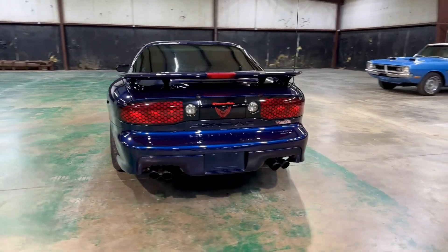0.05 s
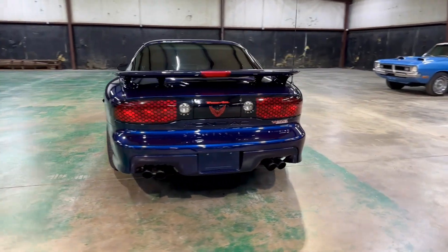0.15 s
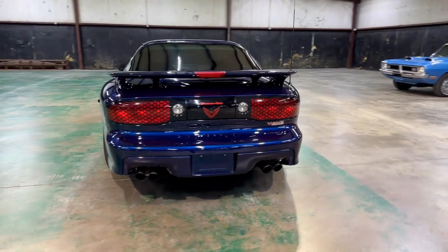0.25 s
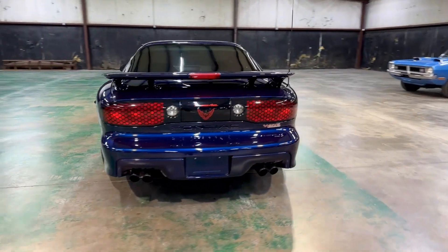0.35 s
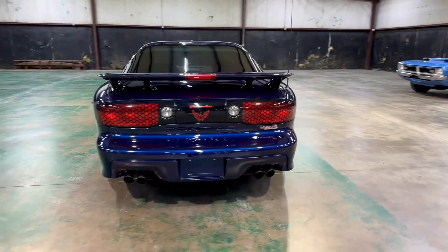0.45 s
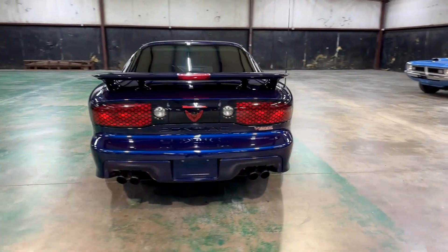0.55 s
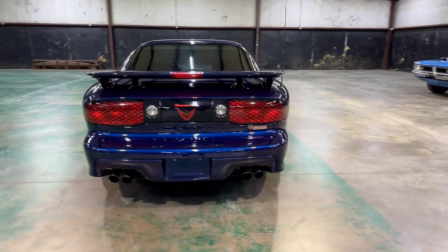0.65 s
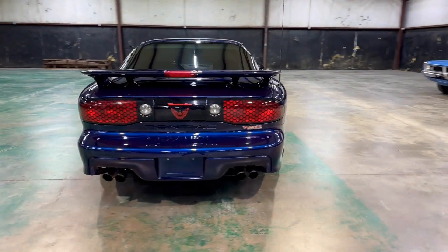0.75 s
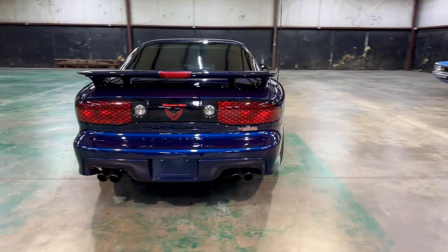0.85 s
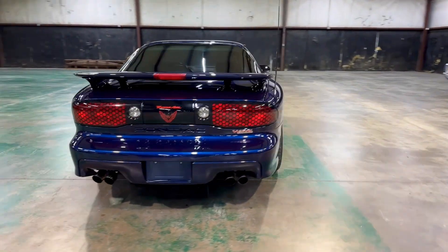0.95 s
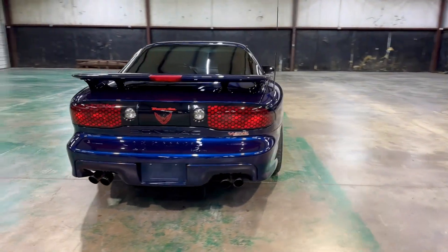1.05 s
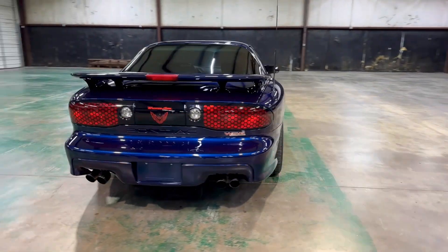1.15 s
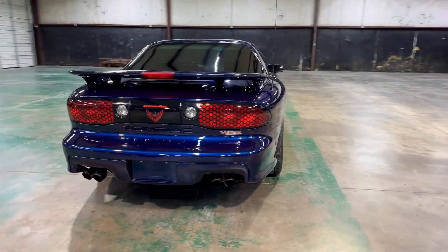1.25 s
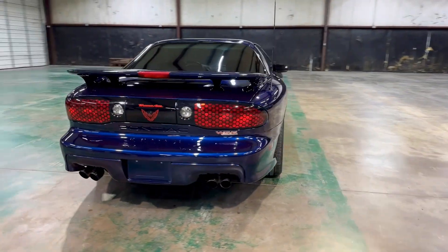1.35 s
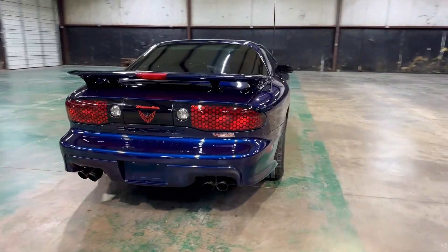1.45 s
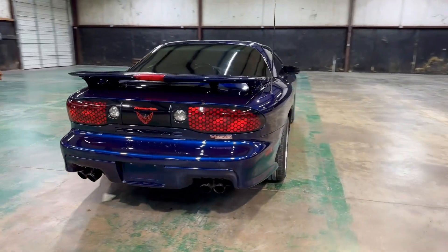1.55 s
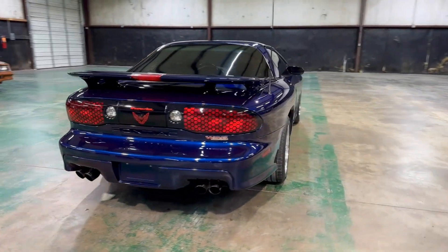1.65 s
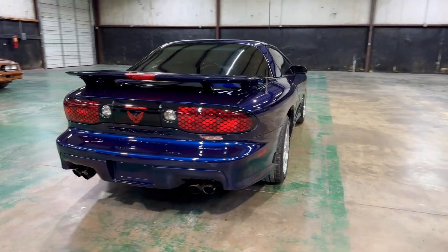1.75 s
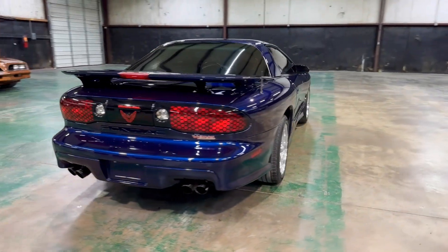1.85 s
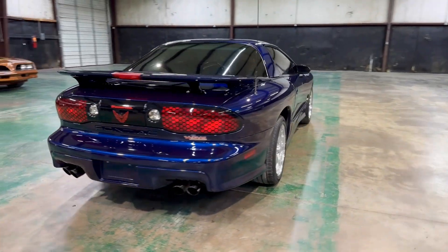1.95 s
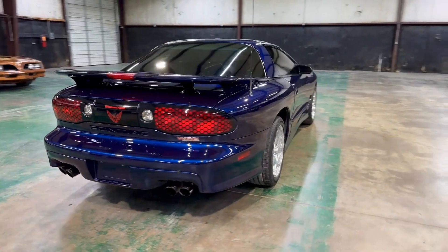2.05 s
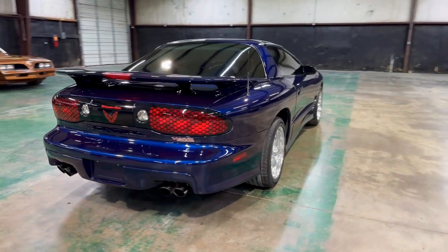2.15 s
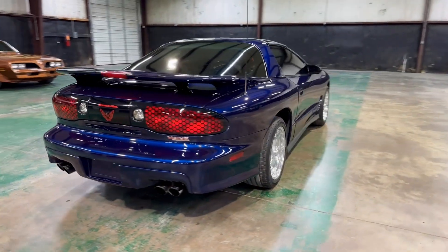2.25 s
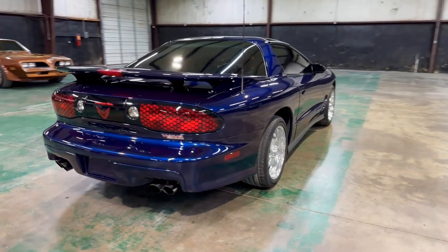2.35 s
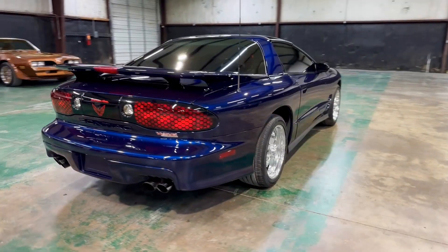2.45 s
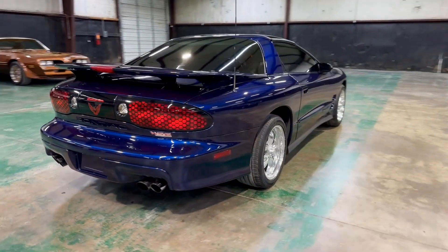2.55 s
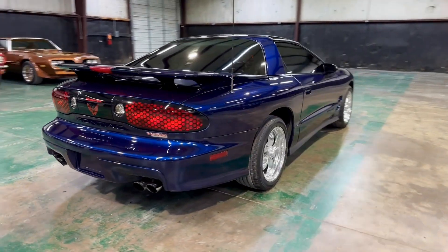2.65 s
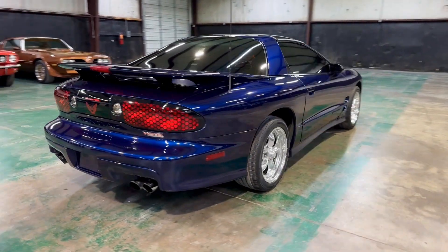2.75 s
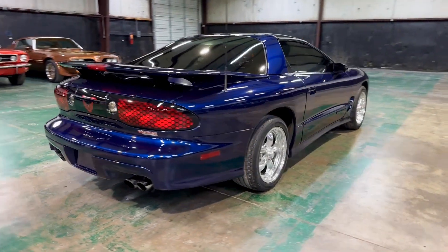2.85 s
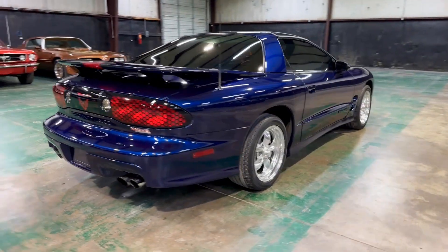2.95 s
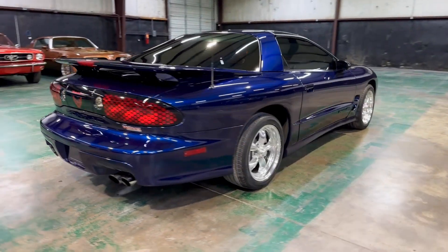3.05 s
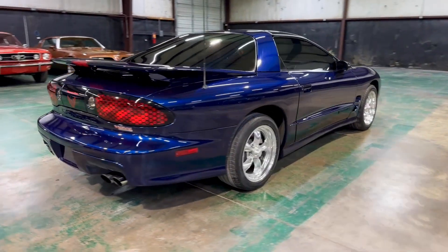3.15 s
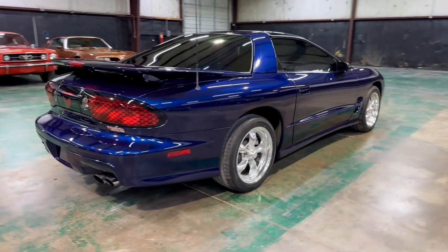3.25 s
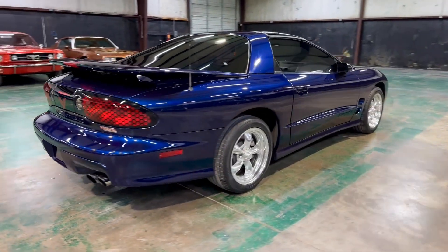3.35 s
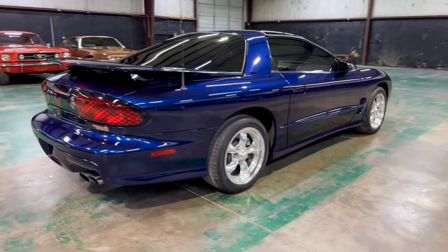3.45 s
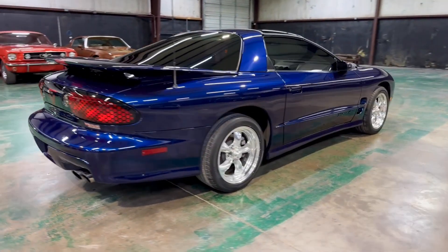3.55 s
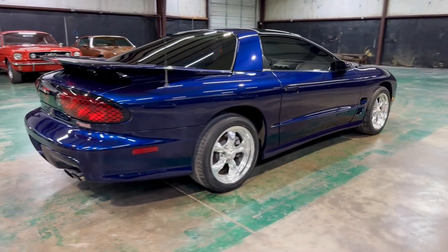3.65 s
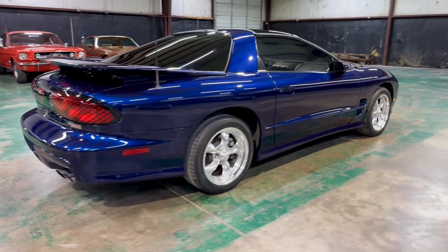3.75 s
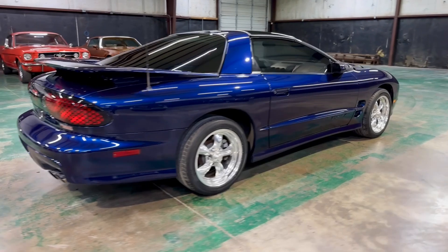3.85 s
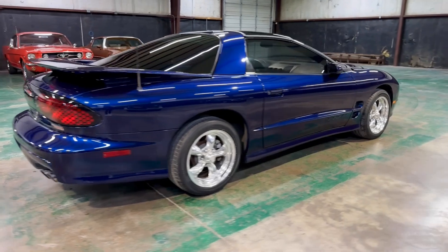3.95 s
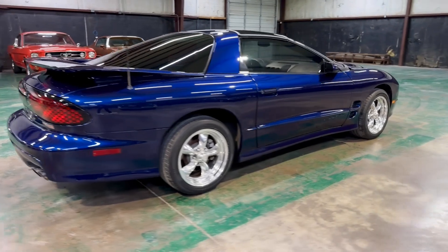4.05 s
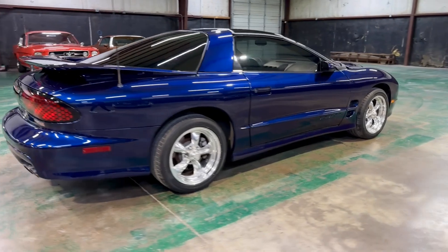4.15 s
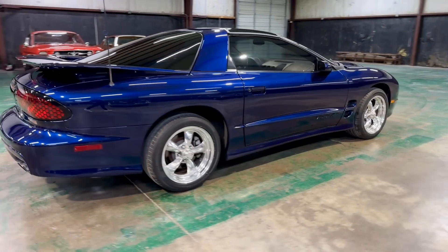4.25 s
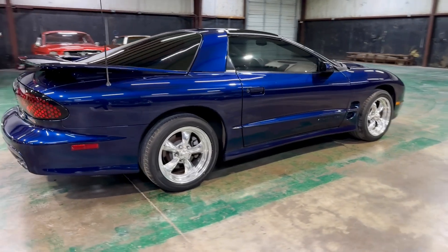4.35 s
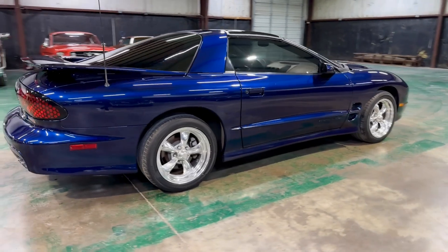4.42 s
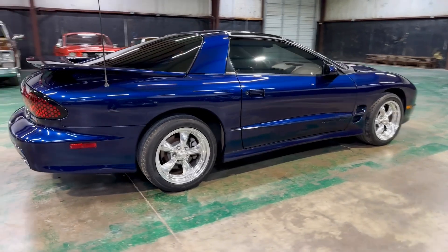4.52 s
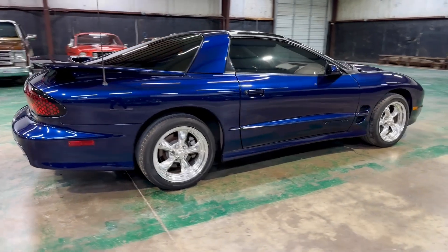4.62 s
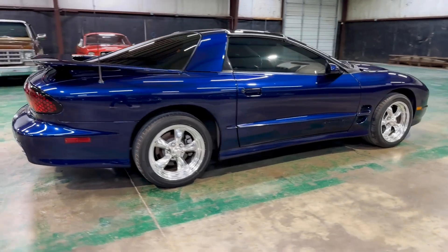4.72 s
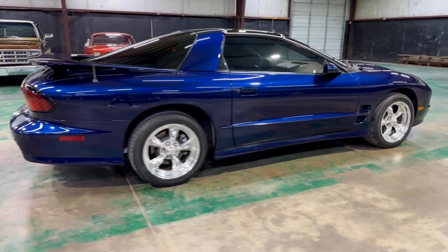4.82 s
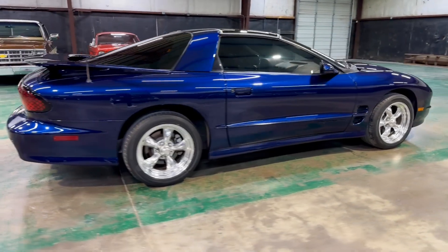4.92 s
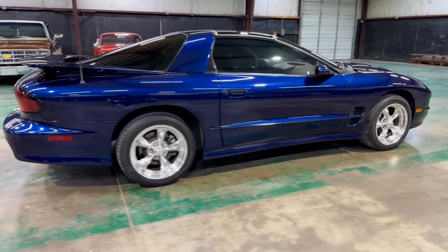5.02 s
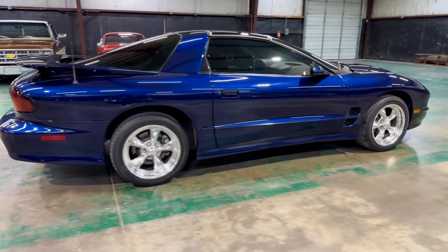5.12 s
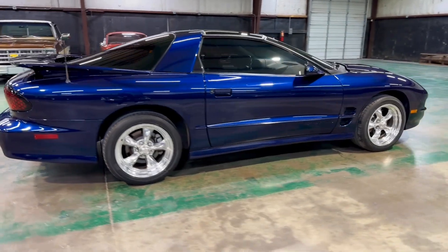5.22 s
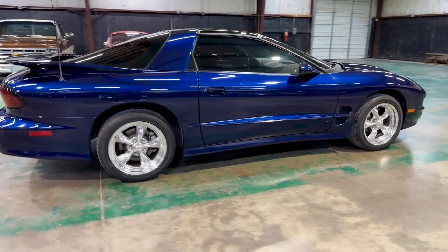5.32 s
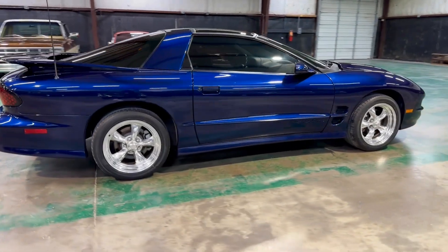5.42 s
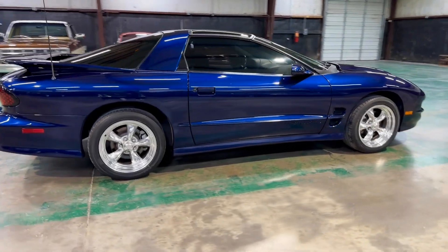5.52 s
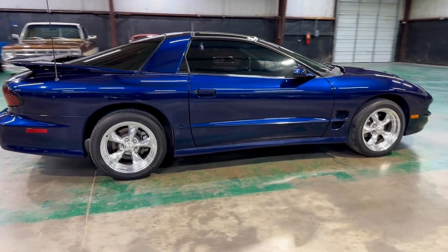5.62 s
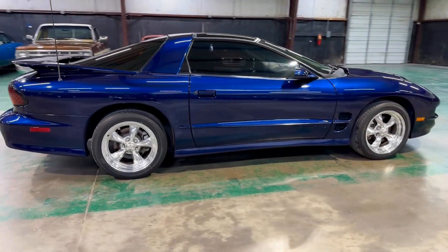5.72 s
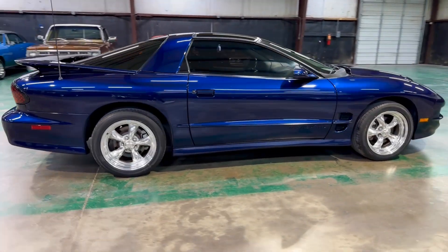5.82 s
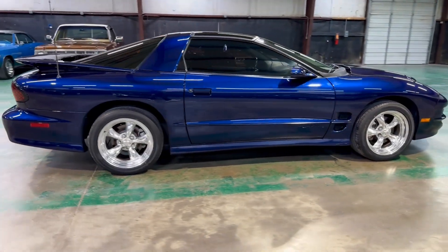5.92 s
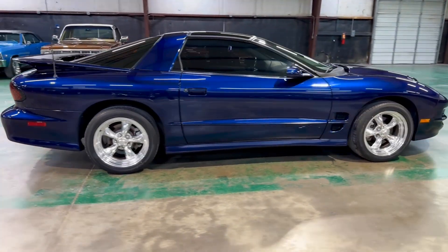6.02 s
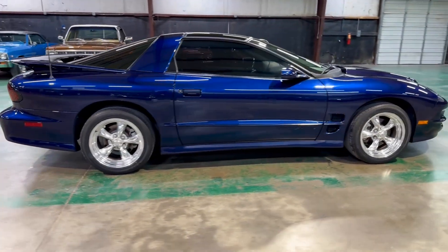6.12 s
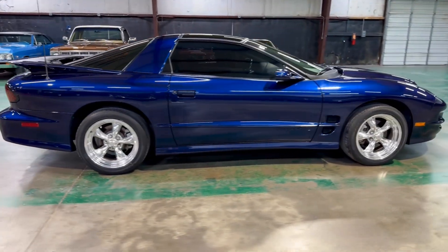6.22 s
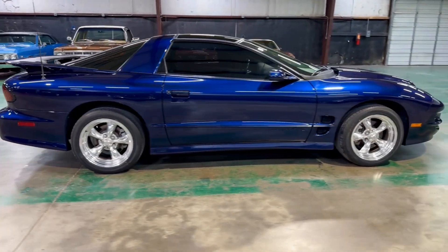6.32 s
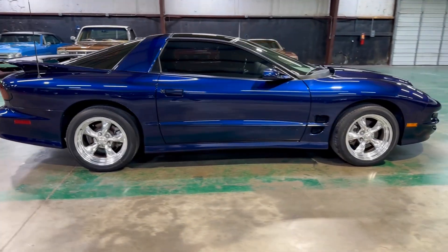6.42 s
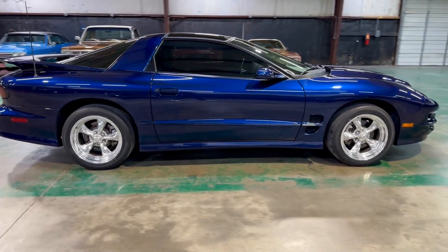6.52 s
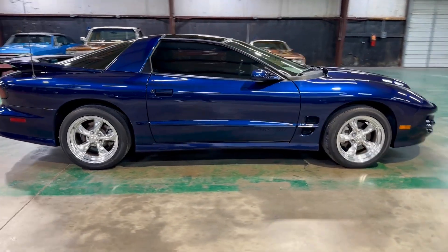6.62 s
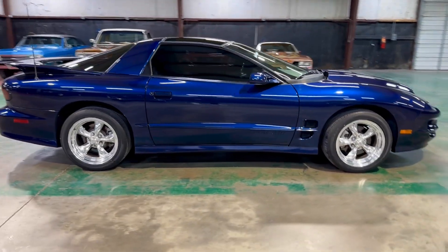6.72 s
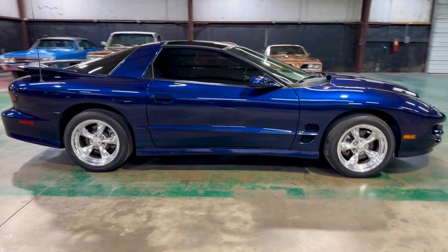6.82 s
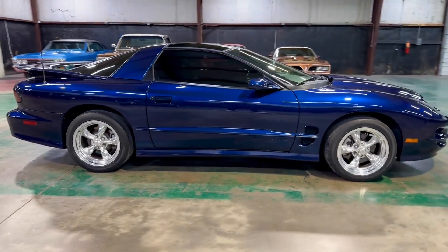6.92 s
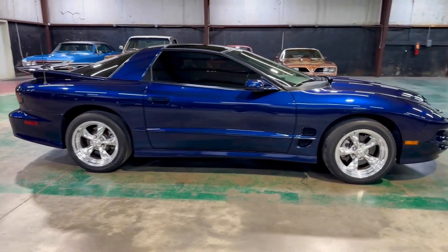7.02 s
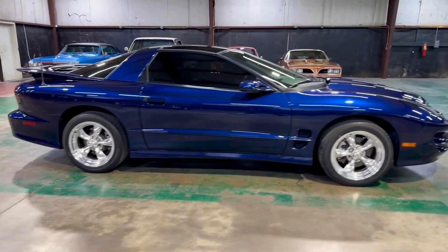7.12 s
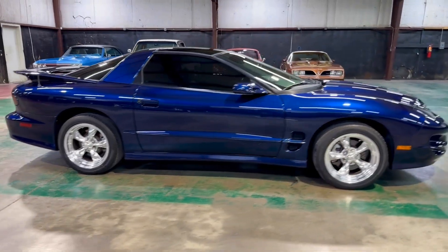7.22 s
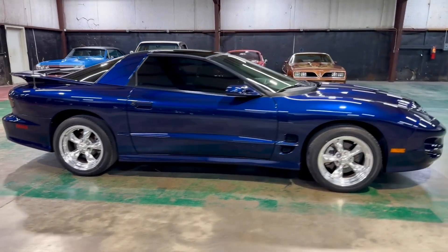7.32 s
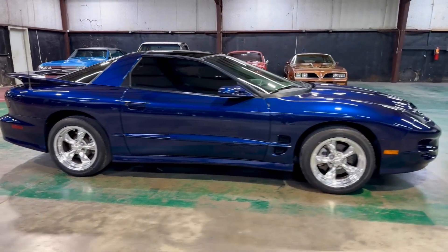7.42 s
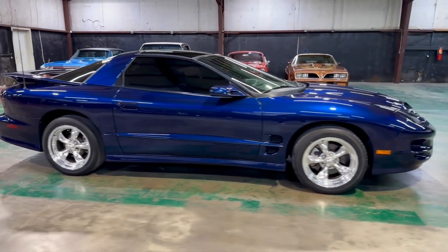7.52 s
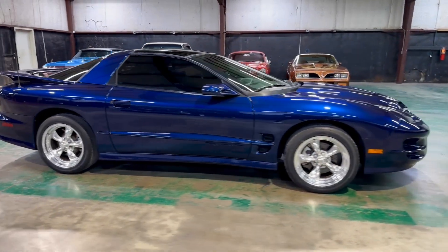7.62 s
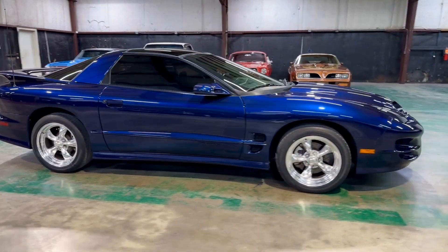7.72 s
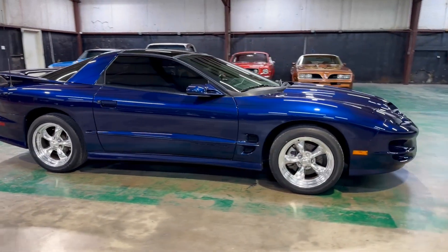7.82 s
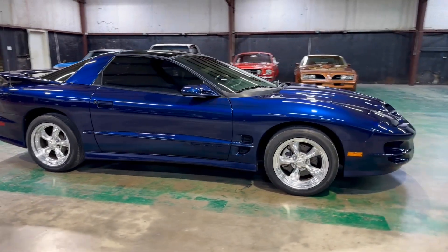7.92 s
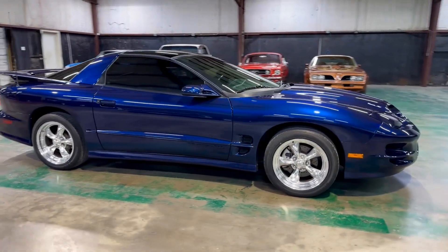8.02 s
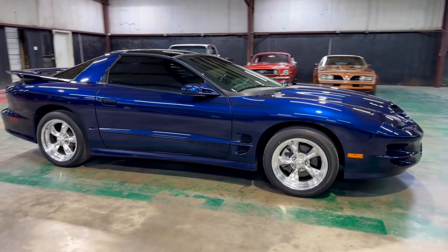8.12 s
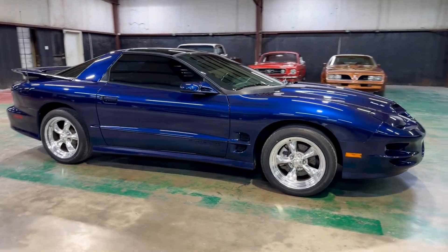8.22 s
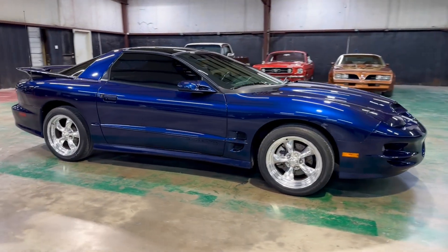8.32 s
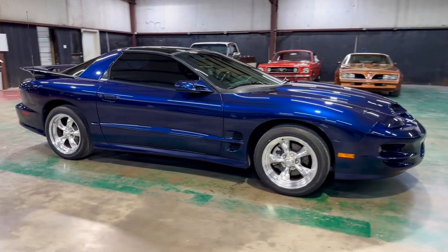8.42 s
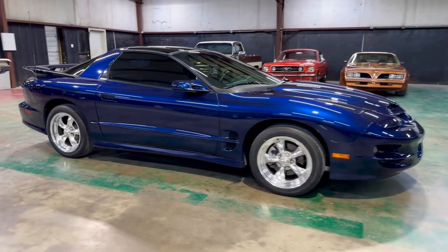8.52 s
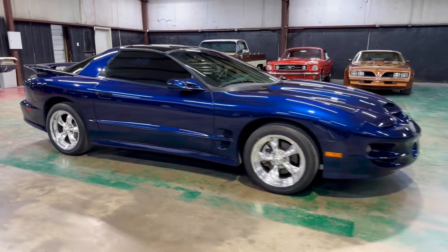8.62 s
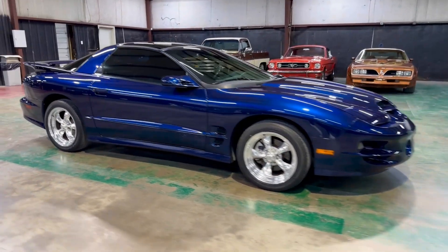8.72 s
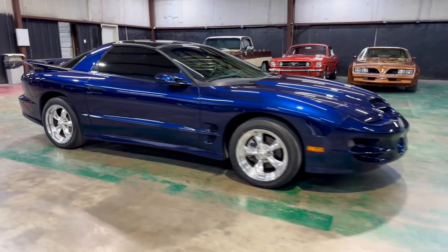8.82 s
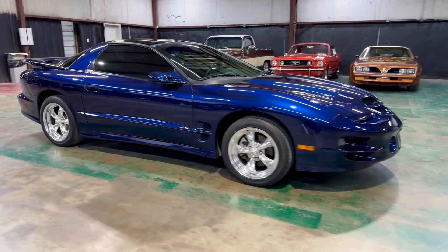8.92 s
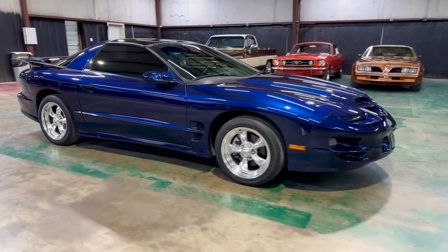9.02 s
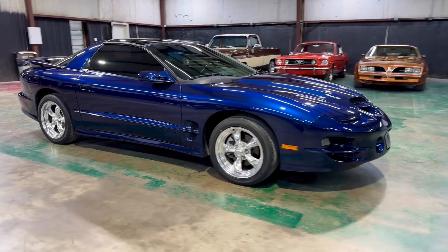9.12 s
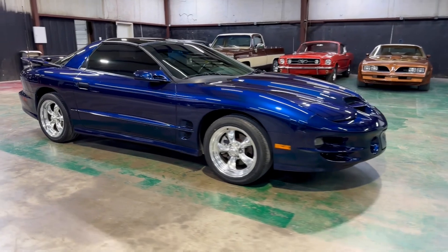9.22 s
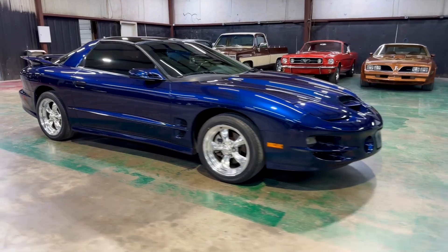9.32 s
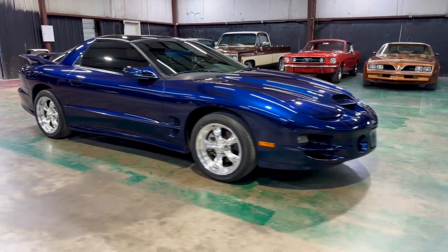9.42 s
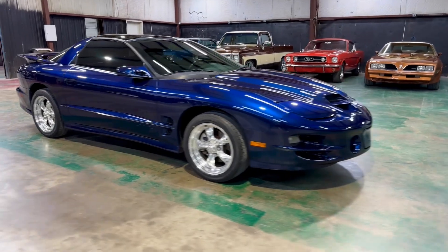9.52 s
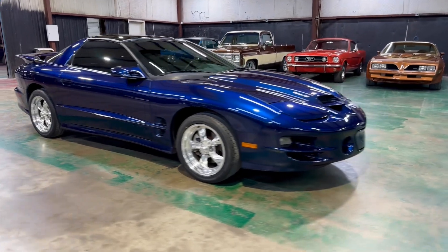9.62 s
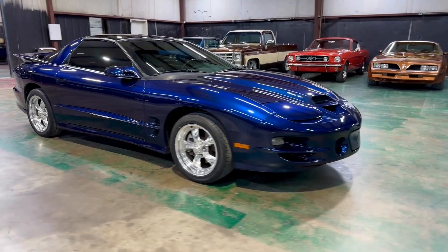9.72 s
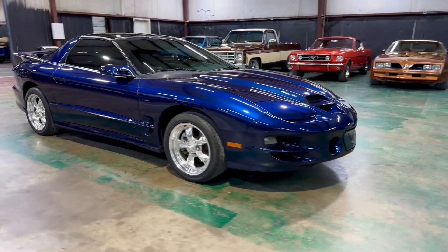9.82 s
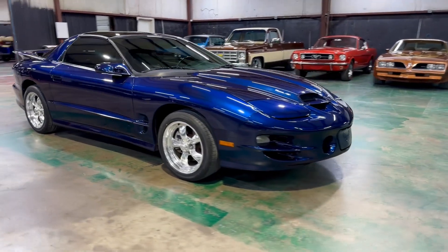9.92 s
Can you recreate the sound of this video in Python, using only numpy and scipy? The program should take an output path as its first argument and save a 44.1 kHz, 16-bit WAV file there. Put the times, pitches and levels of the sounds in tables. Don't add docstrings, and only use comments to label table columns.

```python
import sys
import numpy as np
from scipy import signal
from scipy.fft import rfft, irfft
from scipy.io import wavfile
from scipy.ndimage import uniform_filter1d

SR = 44100
rng = np.random.default_rng(int(sys.argv[2]) if len(sys.argv) > 2 else 0)


def inscribe(sig):
    pcm = np.round(np.clip(np.atleast_2d(sig).T, -1, 1) * 32767)
    wavfile.write(sys.argv[1], SR, pcm.astype(np.int16))


def convert_level_to_amplitude(level_db):
    exponent = np.asarray(level_db, float) / 20
    return 10 ** exponent


N = 439677
T = np.arange(N) / SR

# (time [s], rate [firings/s])
FIRING_RATE = [(0.0, 61.49), (0.66, 61.96), (1.33, 61.38), (1.99, 61.49), (2.66, 61.59), (3.32, 61.95),
               (3.99, 61.13), (4.65, 60.59), (5.32, 61.38), (5.98, 61.13), (6.65, 61.38), (7.31, 61.0),
               (7.98, 60.87), (8.64, 61.23), (9.31, 60.97), (9.97, 61.18)]
# (lag in long pipe, silencer, tips [ms]; share in the same three [1])
CYLINDERS = [(2.48, 4.24, -1.36, -0.21, -0.59, 0.83), (0.46, 1.79, -6.65, 0.67, 0.66, -0.68),
             (5.34, 5.35, 4.62, -0.51, 0.28, -0.43), (4.98, -0.81, 2.46, 0.12, -0.27, 0.23),
             (4.68, 4.08, 6.06, 0.77, 0.37, -0.19), (5.4, 6.24, 5.22, 0.36, -0.78, -0.35),
             (-3.65, -5.7, 3.02, 0.36, 0.54, 0.48), (-4.4, -3.56, -7.64, 0.63, 0.16, -0.46)]
# (centre [Hz], width [Hz], part [0 long pipe, 1 silencer, 2 tips])
PIPE_MODES = [(38.4, 10.0, 0.0), (53.8, 35.0, 0.0), (83.2, 35.0, 0.0), (104.5, 16.8, 0.0),
              (150.0, 11.2, 0.0), (182.0, 18.8, 1.0), (202.8, 10.0, 1.0), (228.4, 28.3, 1.0),
              (239.6, 10.0, 1.0), (282.4, 10.0, 2.0), (317.3, 28.8, 2.0), (370.8, 10.0, 2.0),
              (422.4, 34.4, 2.0), (492.8, 10.0, 2.0)]
PIPE_MODE_DB = [-0.2, -.3, -1.7, 0, 0.2, -0.7, 0.6, 0.95, 2.5, 0.04, 0.1, -0.7, 1.5, -2]
# (left gain [1], left lag [ms], right gain [1], right lag [ms])
MODE_SIDES = [(17.81, 0.75, -7.52, 4.96), (4.95, -6.12, -5.33, -6.08), (2.38, 2.56, 0.21, -4.0),
              (-11.07, 0.66, -3.63, -0.79), (-4.8, -7.82, -15.25, 0.04), (3.89, 1.58, 12.9, 4.52),
              (12.85, 8.05, 22.71, 0.58), (2.56, -7.58, -11.15, 4.48), (11.41, -0.84, 12.58, 4.41),
              (13.3, -2.58, 7.37, -6.96), (-5.3, -2.92, 4.66, 0.52), (7.47, -0.09, 5.27, -1.07),
              (2.32, -7.53, -0.4, 6.68), (-2.93, 1.73, -2.22, -5.21)]
# (level [dB], easing of the 1.5 dB per dB fall-off [dB per dB of
BURBLE_GAIN = [(2.0, 0.64), (2.5, 0.59), (3.0, 0.32)]
# (time [s], level [dB])
LOPE = [
    (0, -4),
    (.5, -3.5),
    (1.2, 0),
    (2.1, 2),
    (3.2, -0.5),
    (4.4, .3),
    (5.8, 0.5),
    (7.2, 1.5),
    (8.4, 1.2),
    (9.5, 3.5),
]
LOPE_SHARE = (0.13, 0.54, 2)
# (left level [dB], left lag [turns], right level [dB], right lag [turns])
DRONE_SIDES = [(-11.669, 0.113, -15.386, -0.302), (-8.29, -0.163, -13.755, 0.379),
               (-25.601, 0.283, -28.301, -0.137)]
# (level [dB], lag [turns], phase slide [turns/s])
NEAR_WALLS = [(-25.677, -0.403, -0.074), (-30.035, 0.306, 0.22), (-32.848, -0.264, 0.084)]
# (level [dB], lag [turns], phase slide [turns/s])
FAR_WALLS = [(-38.914, 0.417, -0.324), (-28.215, -0.068, -0.249), (-42.734, -0.492, 0.283)]
# (time [s], nearness of tips [dB], right tips against left [1], extra path [ms])
WALK = [(0.0, -0.12, 0.15, -1.08), (0.5, -0.45, 0.51, 0.34), (1.2, 2.93, 0.85, -0.15),
        (2.0, 1.79, 0.98, -0.58), (2.8, 0.87, 1.16, -0.18), (3.8, -2.82, 1.52, -0.19),
        (4.8, -5.39, 1.51, -0.87), (5.8, -7.46, 1.4, -0.26), (7.0, -10.81, 2.28, 0.11),
        (8.0, -11.19, 1.57, 1.16), (9.0, -12.3, 1.72, 2.45), (9.97, -13.43, 0.8, 4.29)]
# (frequency [Hz], density [dB per Hz])
GAS_SPECTRUM = [(300, -22), (355, 3), (383, -2.5), (415, -3.5), (440, 1.5), (462, 0), (492, 0.5),
                (540, -8.5), (580, -25), (640, -30), (810, -51.5)]
# (frequency [Hz], density [dB per Hz])
FAN_SPECTRUM = [(330, -42), (560, 1.5), (596, -1.5), (729, 3.5), (1050, 3), (1140, 4.5), (1410, -1),
                (1600, -2), (2080, -12.5), (3520, -120)]
# (frequency [Hz], density [dB per Hz])
GEAR_SPECTRUM = [(820, -43), (1400, -11.5), (1840, -5.5), (1970, 0.5), (2140, -0.5), (3290, 0.5), (3830, 0),
                 (4230, 0), (4400, -2), (5120, -3), (5780, -9.5), (6720, -8), (7280, -13.5), (7890, -13.5),
                 (15500, -38)]
# (centre [Hz], width [Hz], level [dB])
PULLEYS = [(741, 45, -13.5), (1135, 26, -18.5), (1745, 30, -15), (1920, 20, -15.5), (3812, 56, -11.5),
           (3500, 43, -18), (4490, 34, -12.5), (5000, 60, -16), (6560, 150, -19.5)]
# (time [s], peak [dB], centre [Hz])
TICKS = [(3.921, -24, 3340), (4.575, -25, 3090), (5.2285, -18, 3020), (5.3348, -25, 2680),
         (5.4994, -19, 2780), (5.8894, -22, 3700), (6.4094, -20, 3050), (6.534, -27, 3020),
         (7.8403, -40, 3200), (8.2872, -18, 3100), (8.886, -18, 3780), (9.1128, -22, 3500),
         (9.26, -34, 2640), (9.4194, -19, 2610), (9.6749, -20.5, 2600), (9.8051, -20, 3070)]
# (time [s], peak [dB], centre [Hz])
DROPLETS = [(0.0478, -43.5, 8610), (0.08, -31, 8900), (0.288, -49, 7800), (0.4035, -46, 8100),
            (0.4349, -49, 8630), (0.627, -38, 8900), (0.7916, -48, 9040), (0.8545, -40, 7900),
            (0.9338, -44, 9220), (1.0176, -46, 8200), (1.1134, -40, 7960), (1.1927, -44, 7550),
            (1.277, -46, 7930), (1.3409, -42, 9000), (1.3718, -52.5, 8100), (1.4042, -34, 8800),
            (1.716, -57, 7810), (1.8956, -40, 8150), (2.1844, -44, 7860), (2.6429, -52, 7770)]
# (frequency [Hz], density [dB per Hz])
HALL_SPECTRUM = [(34, -18.5), (48, -12.5), (90, -20), (140, 8), (250, 2.5), (350, -5.5), (600, -31)]
# (frequency [Hz], density [dB per Hz])
SWAY_SPECTRUM = [(0.59, -31), (1.0, 7), (16, -8), (25, 13), (32, -37), (55, -120)]


def level(x, db):
    return x * convert_level_to_amplitude(db) / np.sqrt(np.mean(x ** 2))


def curves(table):
    s, *columns = np.transpose(table)
    return [np.interp(T, s, c) for c in columns]


def ring(x, hz, width_hz):
    return signal.lfilter(*signal.iirpeak(hz, hz / width_hz, fs=SR), x)


def ring_twice(x, hz, width_hz):
    return ring(ring(x, hz, width_hz), hz, width_hz)


def colour(spectrum):
    hz, db = np.transpose(spectrum)
    log_hz = np.log(np.fft.rfftfreq(N, 1 / SR) + 1e-9)
    gain = convert_level_to_amplitude(np.interp(log_hz, np.log(hz), db, left=-90, right=-90))
    return level(irfft(rfft(rng.standard_normal(N)) * gain, N), 0)


def wander(rate_hz):
    hold = int(SR / rate_hz)
    steps = np.repeat(rng.standard_normal(N // hold + 1), hold)
    smooth = uniform_filter1d(uniform_filter1d(steps, hold), hold)
    return level(smooth[:N], 0)


def pulses(times_s, size):
    at = np.clip(times_s * SR, 0, N - 2)
    whole = at.astype(int)
    part = at - whole
    return np.bincount(whole, size * (1 - part), N) + np.bincount(whole + 1, size * part, N)


def distance_gain(near_db, tips_db, slope):
    return convert_level_to_amplitude(tips_db + slope * near_db)


def passing(centre_s, half_s, db):
    return convert_level_to_amplitude(db * np.exp(-((T - centre_s) / half_s) ** 2))


def flank_opening():
    return passing(4.1, 2.2, 1.1)


def delay(lag_turns):
    return np.exp(-2j * np.pi * lag_turns)


def drone(turns):
    near_db, right, _ = curves(WALK)
    lag_turns = 0.1
    out = 0
    for harmonic, (sides, *walls) in enumerate(zip(DRONE_SIDES, NEAR_WALLS, FAR_WALLS), 1):
        left_db, left_lag, right_db, right_lag = sides
        direct = convert_level_to_amplitude(left_db) * delay(left_lag) + right * convert_level_to_amplitude(right_db) * delay(right_lag)
        echoes = sum(convert_level_to_amplitude(db) * delay(lag + slide * T) for db, lag, slide in walls)
        heard = convert_level_to_amplitude(near_db) * direct + echoes
        line = (heard * delay(harmonic * (lag_turns - turns))).real
        out = out + convert_level_to_amplitude(0.5 * wander(14)) * line
    return out


def burble(turns):
    firing = np.arange(int(turns[-1]))
    fired_s = np.interp(firing, turns, T)
    cylinder = np.array(CYLINDERS)[firing % 8]
    chance = rng.standard_normal((len(firing), 4))
    near_db, right, path_ms = (np.interp(fired_s, T, c) for c in curves(WALK))
    lope_db = np.interp(fired_s, *np.transpose(LOPE))
    out = 0
    for (hz, width_hz, part), sides, mode_db in zip(PIPE_MODES, MODE_SIDES, PIPE_MODE_DB):
        part = int(part)
        left_gain, left_ms, right_gain, right_ms = sides
        blow_s = fired_s + (cylinder[:, part] + path_ms + 0.04 * chance[:, 0]) / 1000
        part_db, easing = BURBLE_GAIN[part]
        size = cylinder[:, part + 3] + 0.06 * chance[:, part + 1]
        size = size * convert_level_to_amplitude(part_db + (1.5 - easing) * near_db + LOPE_SHARE[part] * lope_db)
        left_blow = pulses(blow_s + left_ms / 1000, size * left_gain)
        right_blow = pulses(blow_s + right_ms / 1000, size * right * right_gain)
        out = out + convert_level_to_amplitude(mode_db) * ring(left_blow + right_blow, hz, width_hz)
    pole = np.exp(-2 * np.pi * 400 / SR)
    return 2.86 * signal.lfilter([(1 - pole) ** 2], [1, -2 * pole, pole ** 2], out)


def gas_rush(beat, near_db):
    shade = passing(2.25, 0.54, -7) * passing(9.35, 0.3, -5.5)
    pulsing = convert_level_to_amplitude(0.36 * beat + 0.37 * wander(16))
    return distance_gain(near_db, -38, 0.65) * shade * pulsing * colour(GAS_SPECTRUM)


def spray(turns, near_db):
    firing = np.arange(int(turns[-1]))
    late_turns = rng.uniform(0, 1, len(firing))
    strength = rng.exponential(size=len(firing))
    spit_s = np.interp(firing + late_turns, turns, T)
    fade = np.exp(-np.arange(1024) / SR / 0.004)
    out = 0
    for hz, db in ((8700, 1.0), (10500, -5.5), (13000, -5.5)):
        own = rng.standard_normal(len(firing))
        spits = pulses(spit_s, convert_level_to_amplitude(np.minimum(3 * strength, 8) + 2.5 * own))
        puffs = np.convolve(spits, fade)[:N]
        out = out + level(ring_twice(puffs * rng.standard_normal(N), hz, hz * 0.3), db)
    fits = convert_level_to_amplitude(1.8 * wander(10))
    return distance_gain(near_db, -65, 0.51) * convert_level_to_amplitude(-3.5) * flank_opening() * fits * out


def fan(beat, near_db):
    pulsing = convert_level_to_amplitude(0.34 * beat + 0.85 * wander(16))
    return distance_gain(near_db, -43, -0.11) * pulsing * colour(FAN_SPECTRUM)


def pulleys(lap):
    out = 0
    for hz, width_hz, db in PULLEYS:
        tone = level(ring(rng.standard_normal(N), hz, width_hz), 0)
        out = out + convert_level_to_amplitude(db + 2.2 * lap + 1.2 * wander(9)) * tone
    return out


def valve_gear(beat, near_db):
    belt_hz, start_turns = 3.02, 0.36
    lap = np.cos(2 * np.pi * (belt_hz * T - start_turns))
    clatter = convert_level_to_amplitude(0.25 * beat + 0.59 * wander(23) + 0.034 * lap) * colour(GEAR_SPECTRUM)
    opening = flank_opening() * passing(9.85, 0.59, 1.5)
    return distance_gain(near_db, -42, -0.34) * opening * convert_level_to_amplitude(-1.3) * (clatter + pulleys(lap))


def taps(events, fade_s):
    out = np.zeros(N + 2048)
    t = np.arange(2048) / SR
    for s, db, hz in events:
        strike = rng.standard_normal(len(t)) * np.exp(-t / fade_s)
        burst = ring_twice(strike, hz, hz * 0.35)
        out[int(s * SR):][:len(t)] += convert_level_to_amplitude(db) * burst / np.abs(burst).max()
    return out[:N]


def hall_hum(near_db):
    return level(colour(HALL_SPECTRUM) * distance_gain(near_db, 0, 0.11), -39)


def hand_sway():
    lowpass = signal.butter(6, 16, fs=SR, output="sos")
    return level(signal.sosfilt(lowpass, colour(SWAY_SPECTRUM)), -26.0)


def scene():
    turns = np.cumsum(curves(FIRING_RATE)[0]) / SR
    beat = np.cos(2 * np.pi * turns)
    near_db = curves(WALK)[0]
    exhaust = drone(turns) + burble(turns) + gas_rush(beat, near_db) + spray(turns, near_db)
    bay = fan(beat, near_db) + valve_gear(beat, near_db)
    small = convert_level_to_amplitude(-10) * taps(TICKS, 0.013) + convert_level_to_amplitude(-8) * taps(DROPLETS, 0.004)
    return (exhaust + bay + small + hall_hum(near_db) + hand_sway())[None]


def top_cut(x):
    return signal.sosfilt(signal.butter(12, 15630, fs=SR, output="sos"), x)


def record(dry):
    return top_cut(dry)


dry = scene()
out = record(dry)
inscribe(out)
```